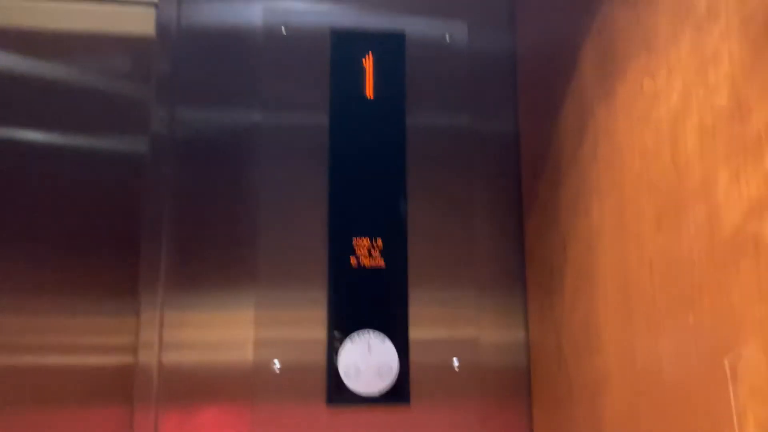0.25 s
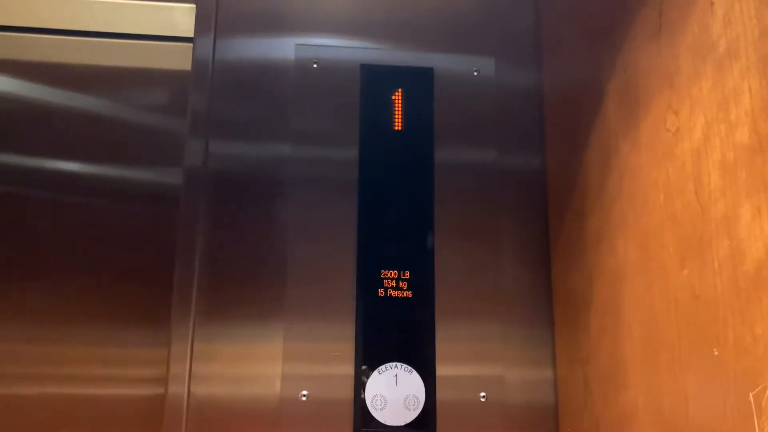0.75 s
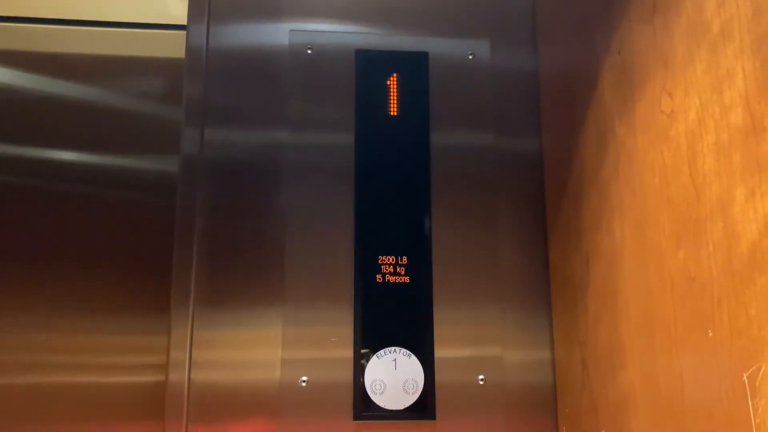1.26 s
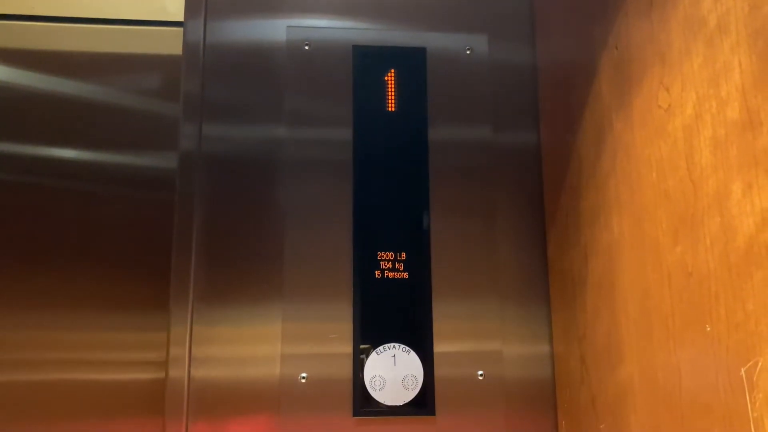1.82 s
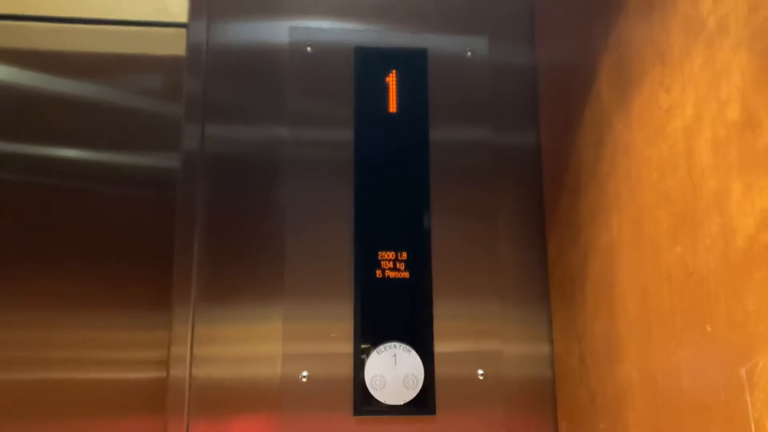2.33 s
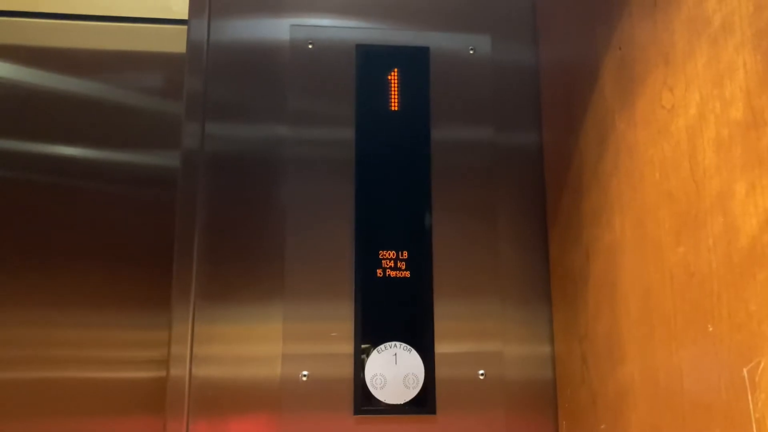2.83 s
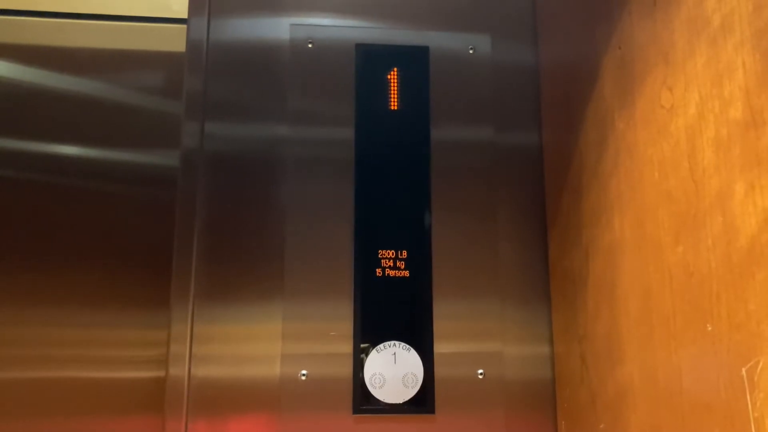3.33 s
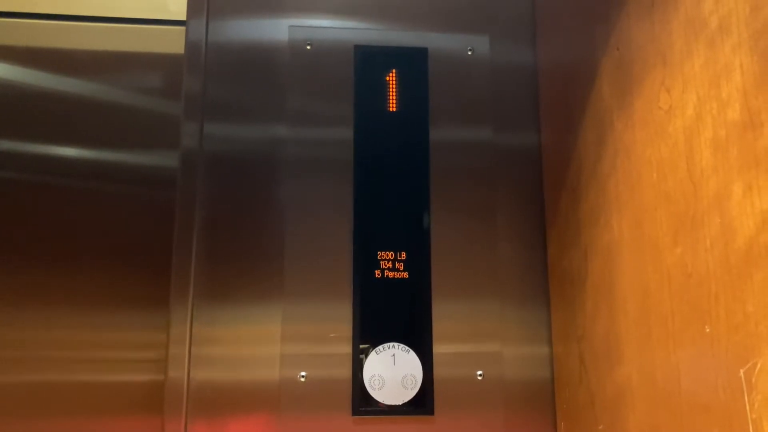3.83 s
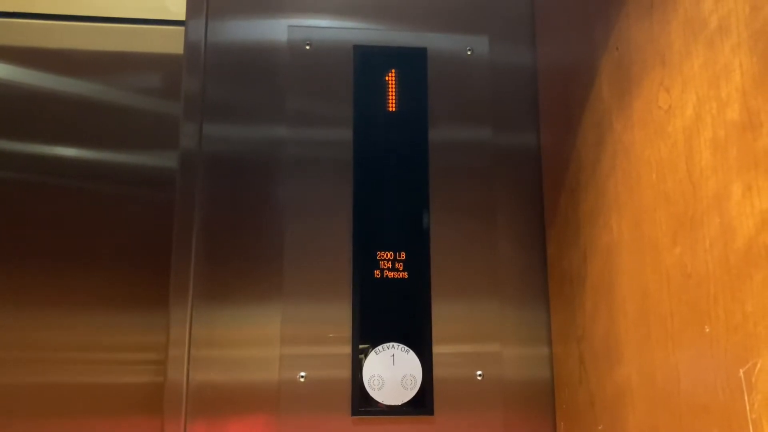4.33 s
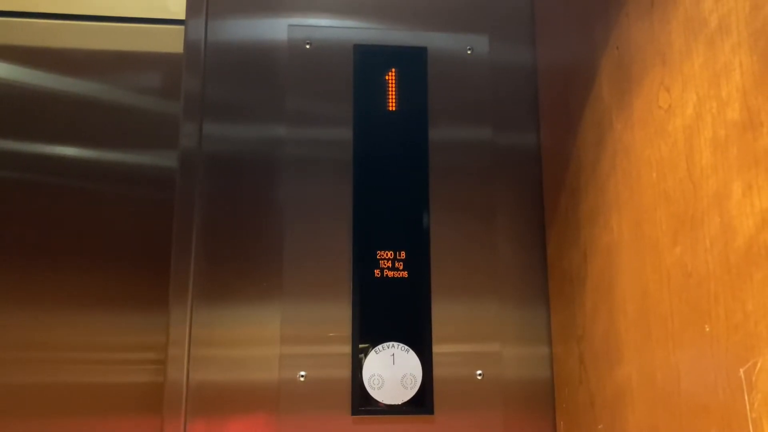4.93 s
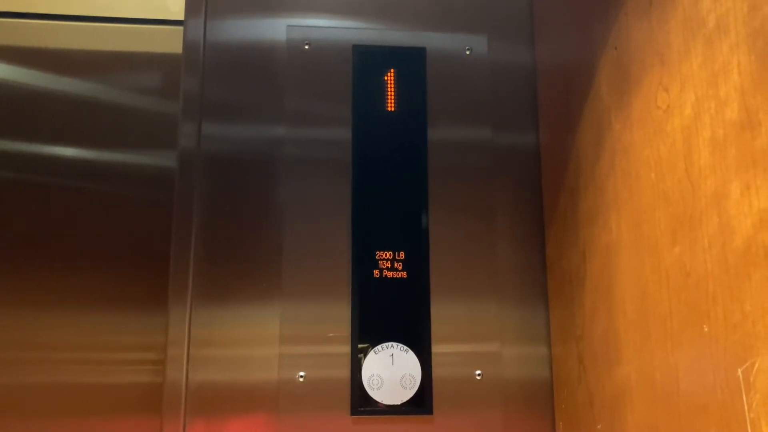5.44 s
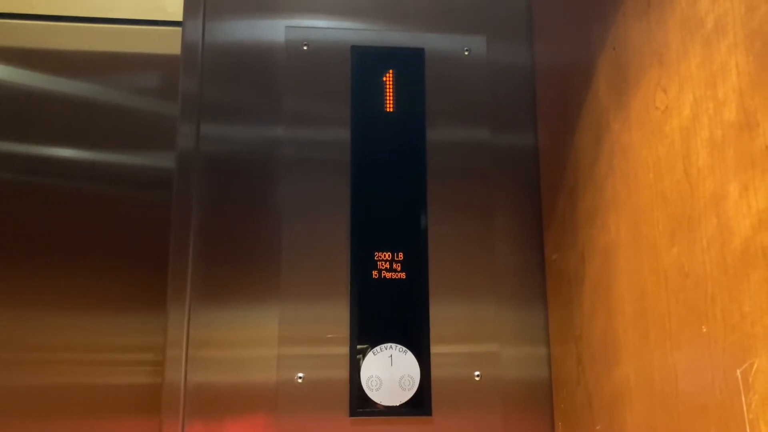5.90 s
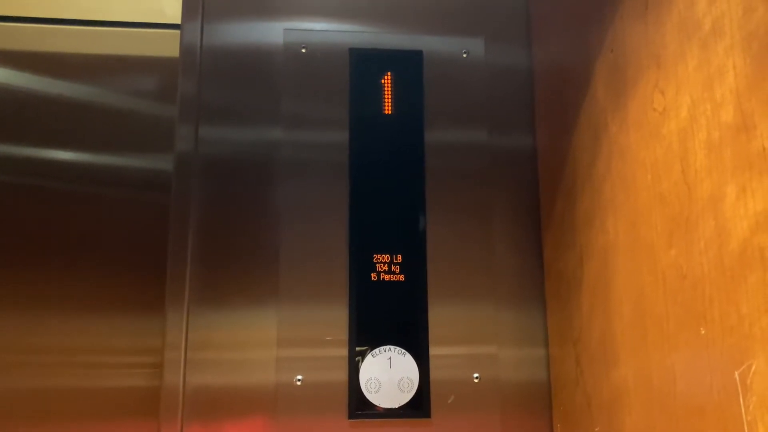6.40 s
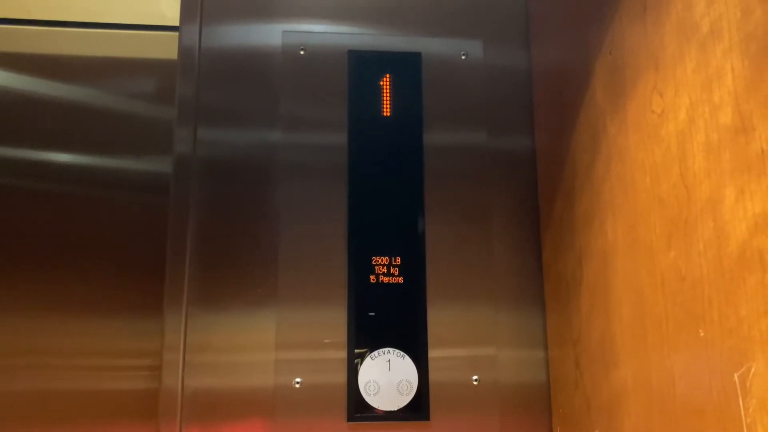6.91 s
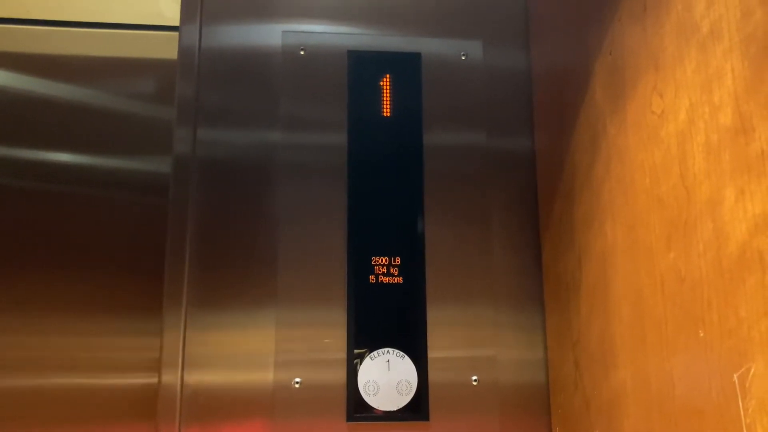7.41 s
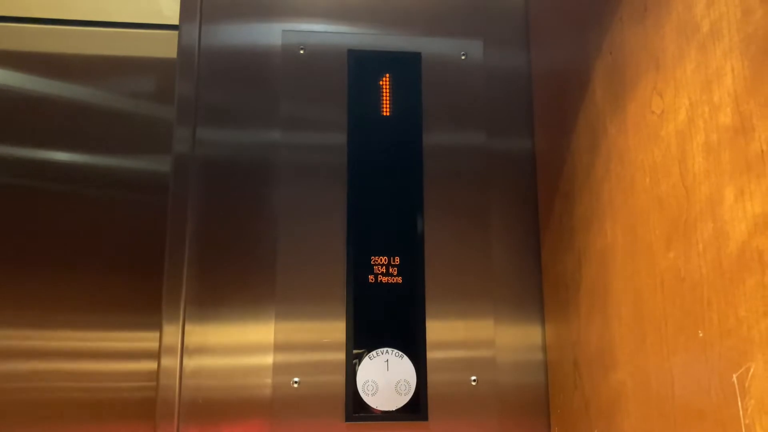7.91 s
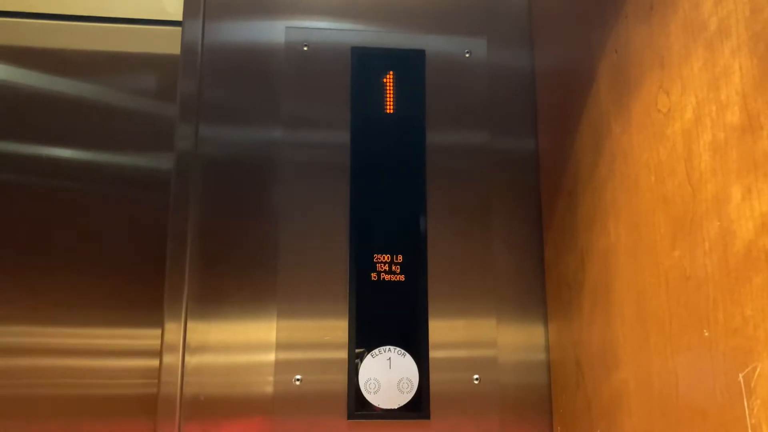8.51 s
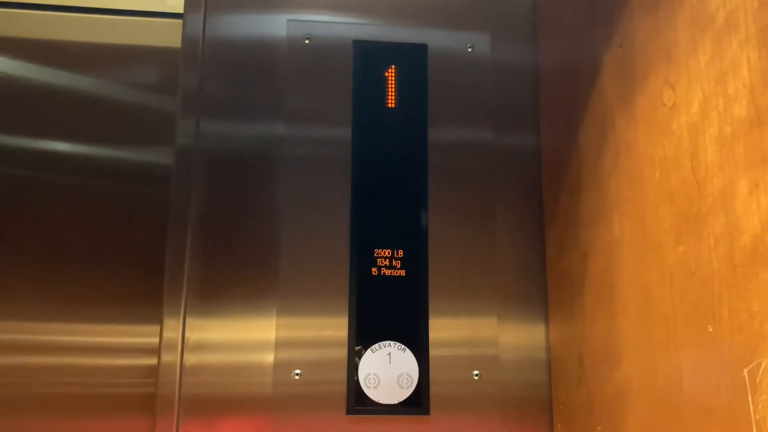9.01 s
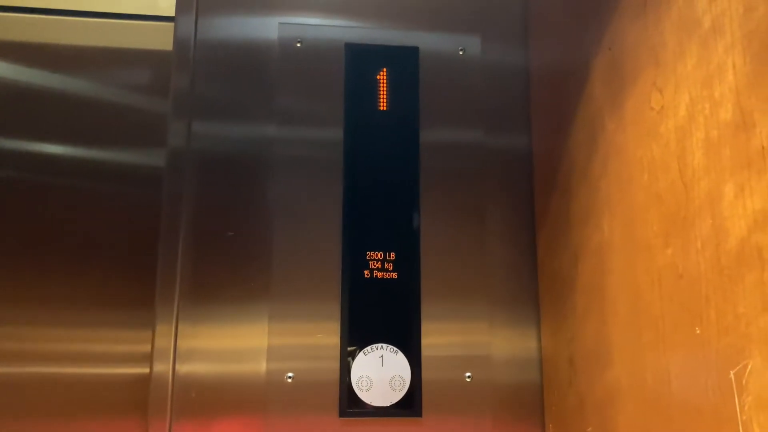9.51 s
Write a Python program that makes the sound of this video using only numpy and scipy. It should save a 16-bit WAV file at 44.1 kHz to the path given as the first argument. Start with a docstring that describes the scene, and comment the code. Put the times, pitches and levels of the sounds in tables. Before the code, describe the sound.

Heard from inside a small steel and wood elevator cab going down, with stereo microphones in the car. A continuous low rumble and dull air rush lie under a small fan motor's steady hum and thin, wavering whine. Its bearing hisses softly about three times a second, with occasional harder scrapes. The guide brushes briefly near the start; the deep boom swells near the end.

```python
"""Hydraulic elevator, descending, inside the cab

A stereo pair stands in the cab: steady air and the rumble of the ride lie behind, with passing low throbs.
A small induction motor, probably the cab fan, hums on its shaft orders and the mains and whines in
wavering strands; its bearing hisses in about three swells a second, with a few harder scrapes and ticks.
The car brushes its guide once and squeaks faintly once.
Tones are sums of sines; air, rumble, hiss and ringing are noise shaped by spectra and resonances.
"""
import sys
import numpy as np
from scipy import signal
from scipy.fft import rfft, irfft, next_fast_len
from scipy.io import wavfile
from scipy.ndimage import uniform_filter1d, map_coordinates

SR = 44100
rng = np.random.default_rng(int(sys.argv[2]) if len(sys.argv) > 2 else 0)


def transcribe(signal):
    """Save signal, clipped to [-1, 1], as a 16-bit WAV file at the path in sys.argv[1]."""
    frames = np.atleast_2d(signal).T
    limited = np.clip(frames, -1, 1)
    pcm = np.round(limited * 32767).astype(np.int16)
    wavfile.write(sys.argv[1], SR, pcm)


N = 429975  # length [samples]

# Rush of air, in phase at both microphones: (frequency [Hz], density before balance [dB per Hz])
AIR_IN_PHASE = [(10, -84.5), (25, -72), (45, -66), (200, -64.5), (245, -65), (350, -63.5), (470, -75.5),
                (640, -76), (800, -77.5), (1050, -84), (1200, -78.5), (1550, -84.5), (2000, -91.5),
                (2400, -89.5), (4100, -99), (6000, -112), (12000, -134)]
# Rush of air, in opposite phase: (frequency [Hz], density before balance [dB per Hz])
AIR_OPPOSED = [(20, -93), (55, -78), (115, -70.5), (170, -67.5), (300, -70), (470, -69), (700, -79),
               (1050, -85.5), (1200, -77.5), (1550, -83), (2500, -89.5), (4100, -99), (6000, -114),
               (12000, -130)]
# Low boom of the ride, before the frame's trim: (time [s], level [dB])
RIDE_LEVEL = [(0, -56), (1.5, -47), (2.3, -44.5), (3.2, -45), (5.6, -44), (6.2, -41), (7.5, -47),
              (8.3, -46.5), (9.2, -32), (9.75, -38.5)]
# Low air modes of the cab, before they follow the ride: (frequency [Hz], width [Hz], peak density [dB per Hz])
CAB_MODES = [(77, 11, -46.5), (92.3, 8.8, -44), (112.4, 6.3, -42), (125, 5.5, -43), (136, 7.6, -46),
             (151, 9, -44), (159.56, 6.6, -42), (177.2, 6.8, -51.5), (196.2, 9.2, -57), (214.7, 18, -61),
             (291.7, 9.2, -61.5), (406.3, 13, -61), (443.3, 12, -67.5), (476.5, 9, -65.5)]
# Sway of the car frame: (frequency [Hz], width [Hz], relative level [dB])
FRAME_MODES = [(54.6, 11, -2), (65, 4.2, 5), (84, 9, 5)]
# Throbs of the cab's low modes: (time [s], frequency [Hz], level [dB])
CAB_THROBS = [(.7, 115.3, -23), (1.38, 158.8, -32.5), (1.95, 160, -25.5), (2.2, 159.2, -25.5),
              (2.5, 157.7, -24), (2.849, 157, -26.5), (3.07, 116, -27), (4.0, 161.9, -26.5),
              (4.24, 119, -22.5), (4.55, 159.7, -27.5), (5.0, 125, -23), (5.12, 159, -35),
              (5.6, 124, -23.5), (5.72, 158.6, -25.5), (6.3, 160.5, -27.5), (6.78, 112, -23.5),
              (7.1, 161.2, -25), (7.18, 85.7, -25.5), (7.5, 159, -25.5), (8.55, 122, -26), (8.7, 161, -30),
              (8.86, 113, -25), (9.2, 124, -25), (9.55, 120.4, -26.5)]
# The guide brushing and squeaking: (time [s], length [s], frequency [Hz], width [Hz], level [dB])
GUIDE_SCUFFS = [(1.64, 0.085, 1640, 850, -48.5), (5.077, 0.034, 11900, 600, -73)]
# Slip of the fifth shaft order behind the mains: (time [s], count [beats])
SLIP_BEATS = [(0, -.05), (1.63, 5), (3.6, 11), (6.55, 20), (9.75, 29.45)]
# Swells of the bearing's rubbing, about one a beat: (time [s], length [s], height [dB])
RUB_SWELLS = [(-0.022, 0.18, 7), (0.26, 0.19, 5), (0.584, 0.13, 4), (0.873, 0.22, 6), (1.225, 0.17, 6),
              (1.534, 0.21, 5.5), (1.849, 0.21, 4.5), (2.2, 0.13, 7.5), (2.522, 0.2, 5), (2.836, 0.2, 4.5),
              (3.155, 0.2, 6), (3.538, 0.15, 8.5), (3.832, 0.19, 6.5), (4.183, 0.14, 7), (4.463, 0.21, 6.5),
              (4.832, 0.2, 6), (5.149, 0.16, 8), (5.443, 0.24, 4), (5.826, 0.16, 8.0), (6.118, 0.21, 6.5),
              (6.462, 0.17, 6.3), (6.782, 0.17, 8.5), (7.141, 0.18, 7), (7.47, 0.19, 6.5), (7.785, 0.23, 5),
              (8.145, 0.25, 5.5), (8.492, 0.11, 7.5), (8.838, 0.14, 6.5), (9.162, 0.2, 6.5),
              (9.502, 0.2, 7.5)]
# Hard scrapes of the bearing: (time [s], extra level [dB])
HARD_SCRAPES = [(.075, 5), (2.23, 3), (4.26, 4), (4.87, 3), (6.24, 5), (6.88, 3), (7.27, 1.5), (7.82, 1),
                (7.94, 4), (9.27, 6)]
# Dry ticks: (time [s], level [dB])
DRY_TICKS = [(3.538, -63), (4.185, -64), (4.53, -63)]
# Spectrum of the bearing hiss: (frequency [Hz], relative level [dB])
HISS_SPECTRUM = [(800, -2.5), (2200, 2), (3300, 5), (4000, 5.5), (5300, 5.5), (5650, -1), (6700, -2.5),
                 (7100, -6.5), (7650, -3), (7900, -5), (8700, -1.5), (9600, -5), (10700, -5), (12000, -14),
                 (14000, -23)]
# Ringing of the fan housing, before trim and swells:
# (frequency [Hz], width [Hz], peak density [dB per Hz], left-right [dB], left lead [rad])
HOUSING_MODES = [(537, 14, -66, 2, -1.5), (563, 10, -67, 2, -1.5), (637, 10, -72, -0.5, -2.5),
                 (660, 10, -72, 3, -1), (772, 12, -74.5, 0, -1), (805, 24, -77, 1, -1),
                 (895, 24, -78.5, 0, 1), (998, 14, -77, 1, 1), (1261, 12, -68, 2.5, 2.5),
                 (1305, 52, -69.5, 2.5, 0.5), (1349, 9.1, -64.5, 6.5, -1.33), (1364, 40, -72.5, 2.5, -1.14),
                 (1630, 30, -80.5, -0.5, 1.5), (1700, 20, -74.5, -2, 3), (1860, 47, -83, 1, 1.5),
                 (2130, 130, -81.7, -2.5, 0.6), (2455, 20, -83.5, 1.5, 0.5), (2658, 39, -84, -1.5, 1.5),
                 (3003, 26, -85, -1, 2.5), (3425, 60, -90, -1.5, 2), (4660, 24, -91.5, -4, 4),
                 (5390, 130, -98, -2.5, 1.5), (5945, 26, -100, 0, 2)]
# Slow rise and fall of the whine, used about its mean: (time [s], level [dB])
WHINE_LEVEL = [(0, 0.5), (1, .5), (1.6, 1.2), (2.3, 1), (2.6, -0.5), (3.25, -0.5), (3.45, -3), (3.7, 1),
               (4.2, 1.5), (4.45, -3), (4.75, 1), (6.6, -.8), (6.85, 1.5), (7.5, -2), (8, 2.5), (8.3, 1.5),
               (8.7, -1), (9.6, 0.5)]
# Lines of the shaft, before trim: (shaft order [1], level [dB], left-right [dB], left lead [rad])
SHAFT_ORDERS = [(2, -57, -1, 0), (3, -29.7, -1, .1), (4, -39.5, -1, .1), (5, -39.5, -1, .2),
                (6, -40, -1, .1), (9, -53, -4, .4), (11, -47.5, -1, .7), (12, -48.3, -1, 1),
                (13, -43.7, -1, .5), (15, -52, 3, -2), (18, -45.2, 1, .5), (20, -54, -2, .3),
                (21, -55.5, -2, -2.5), (23, -58, 7, 2.3), (25, -64, 8, .2), (27, -53, 2, -1.6),
                (28, -58.5, 5, -1.1), (30, -57.5, 3, .8), (44, -66, 3, 1.3), (54, -64, -5, -2.9),
                (57, -64, -4, 2.9), (59, -65, 7, 0), (89, -72.5, -2, .6), (144, -73.5, -5, 1.8),
                (147, -73.5, -1, 1.8)]
# Sum tones of shaft and mains, before trim: (shaft order [1], mains order [1], level [dB],
# left-right [dB], left lead [rad], lateness of the swell [beats])
SHAFT_MAINS_SUMS = [(0, 1, -31, -1, .2, .06), (3, 1, -53, -5, .6, 0), (6, 1, -47.8, -3, .7, .76),
                    (2, 2, -52.5, 0, .3, .52), (8, 1, -44.5, -1, .5, .11), (9, 1, -47, 2, .3, .13),
                    (4, 2, -50, 0, .3, .56), (20, 1, -60, 8, .2, .62), (21, 1, -59.5, 2, -2.4, .13),
                    (22, 1, -51.5, -6, -2.8, .2), (23, 1, -56.5, 1, -1.4, .13), (44, 2, -63, -1, -.2, .52),
                    (46, 2, -62, 2, .9, .52), (52, 1, -63, 2, -.8, .13), (47, 2, -55.2, 10, -1.4, .52),
                    (54, 1, -62, 6, .2, .13), (49, 2, -57, 5, .2, .52), (50, 2, -65, 3, .5, .52)]
# Stronger swells of the strand near 305 Hz: (time [s], extra level [dB])
STRAND_SURGES = [(2.7, 2.5), (3.01, 5), (3.63, 2), (4.95, 3), (6.55, 1.5), (9.63, 2)]
# Flutter of the hum's lines: (frequency [Hz], depth [dB])
LINE_FLUTTER = [(70, .6), (120, 1), (260, 2.3), (420, 1.8), (640, 2.5), (1350, 1.4), (3400, 3)]

MAINS_HZ = 120  # the magnetic pull, first mains order
BEAT_ORDER = 5  # the shaft order that slips behind it
WHINE_TURN_DB = 1.3  # scale of the whine's pulse in each turn
TOUCH_TURNS = 0.77  # place in each turn where the bearing presses hardest


def amp(db):
    """Decibels to gain."""
    return 10 ** (np.asarray(db) / 20)


def unit(x):
    """Scale to rms 1."""
    return x / np.sqrt(np.mean(x ** 2) + 1e-20)


def along(points, hz):
    """Read (Hz, value) points on a log frequency axis."""
    f, v = np.transpose(points)
    return np.interp(np.log(hz + 1), np.log(f + 1), v)


def curve(rows):
    """Turn (s, value) rows into one value per sample."""
    return np.interp(np.arange(N) / SR, *np.transpose(rows))


def bump(s, length):
    """A smooth rise and fall around time s, down to 1/e at length seconds either side."""
    return np.exp(-np.minimum(((np.arange(N) / SR - s) / length) ** 2, 50))


def wobble(rate):
    """A smooth random curve, rate knots a second."""
    knots = rng.standard_normal(400)
    coarse = np.linspace(0, N, 2000)
    smooth = map_coordinates(knots, [coarse * rate / SR], mode='mirror')
    return np.interp(np.arange(N), coarse, smooth)


def noise(response):
    """Noise whose density per root Hz is response(Hz)."""
    m = next_fast_len(N)
    spectrum = rfft(rng.standard_normal(m)) * response(np.fft.rfftfreq(m, 1 / SR))
    return irfft(spectrum, m)[..., :N] * np.sqrt(SR / 2)


def bell(hz, centre, width):
    """Gain of a resonance with steep skirts."""
    return 1 / (1 + ((hz - centre) * np.sqrt(2) / width) ** 2)


def mic_pair(pan_db, lead):
    """Complex gains at the left and right microphone of a standing wave in the cab."""
    half = np.array([[.5], [-.5]])
    return amp(half * pan_db) * np.exp(1j * half * lead)


def patchy(x, depth_db, across_hz=600, lasting_s=.035):
    """Brief random surges and dips, each in its own band, alike on both channels; rms set to 1."""
    hz, t, z = signal.stft(x, SR, nperseg=512)
    field = rng.standard_normal((200, 1500))
    place = np.meshgrid(hz / across_hz, t / lasting_s, indexing='ij')
    gain_db = map_coordinates(field, place, mode='mirror')
    return unit(signal.istft(z * amp(depth_db * gain_db), SR, nperseg=512)[1][:, :N])


def steel_walls(x, t60, wet):
    """Close steel walls add a short dense ring above the bass, decaying 60 dB in t60 seconds."""
    t = np.arange(SR // 3) / SR
    tail = rng.standard_normal((2, len(t))) * amp(-60 * t / t60)
    tail = signal.sosfilt(signal.butter(2, 400, 'high', fs=SR, output='sos'), tail)
    tail /= np.linalg.norm(tail, axis=1, keepdims=True)
    ring = signal.fftconvolve(x, tail, axes=1)[:, :N]
    return (x + wet * ring) / np.hypot(1, wet)


def air(left_db=.5):
    """A steady, slightly patchy rush: shaped noise, common and opposed, ringing between the walls."""
    mid = noise(lambda hz: amp(along(AIR_IN_PHASE, hz)))
    side = noise(lambda hz: amp(along(AIR_OPPOSED, hz)))
    pair = np.array([mid + side, mid - side]) * amp([[left_db], [-left_db]])
    rush = steel_walls(pair, t60=0.17, wet=0.35)
    return rush.std() * patchy(rush, depth_db=1.7, across_hz=130, lasting_s=.08)


def shaken(modes):
    """Noise through a bank of resonances, their powers added."""
    def response(hz):
        power = sum((amp(db) * bell(hz, f, w)) ** 2 for f, w, db in modes)
        return np.sqrt(power) * mic_pair(pan_db=-1.0, lead=0.11)
    return noise(response)


def rumble(frame_db=3, follow=0.17):
    """The moving car shakes the cab's air modes; a deeper boom of the frame follows the ride fully."""
    ride_db = curve(RIDE_LEVEL)
    cab = amp(follow * (ride_db - ride_db.mean())) * shaken(CAB_MODES)
    frame = amp(frame_db + ride_db) * unit(shaken(FRAME_MODES))
    return cab + frame


def throbs(throb_s=0.082):
    """Now and then one low mode of the cab swells up and dies away: a sine under a smooth bump."""
    t = np.arange(N) / SR
    boom = np.zeros(N)
    for s, hz, db in CAB_THROBS:
        tone = np.sin(2 * np.pi * (hz * t + rng.random()))
        boom += amp(db) * bump(s, throb_s) * tone
    return np.sqrt(2) * boom * abs(mic_pair(pan_db=-0.2, lead=0))


def scuffs():
    """The guide's brush and squeak: brief soft noise in one band each, independent per channel."""
    out = np.zeros((2, N))
    for s, length, f, w, db in GUIDE_SCUFFS:
        band = np.array([noise(lambda hz: bell(hz, f, w)) for mic in range(2)])
        out += amp(db) * unit(band) * bump(s, length)
    return out


def motor():
    """Mains cycles and shaft turns: the fifth shaft order slips about three cycles a second behind."""
    mains = MAINS_HZ * np.arange(N) / SR
    return mains, (mains - curve(SLIP_BEATS)) / BEAT_ORDER


def touch(turns, sharp=.4):
    """The press of the bearing through one turn of the shaft: a short peak and a long lull."""
    angle = 2 * np.pi * (turns - TOUCH_TURNS)
    return np.cos(angle) + sharp * np.cos(2 * angle)


def rub(rest_db=-75.5, grab_s=0.024, release_s=0.031, uneven_db=1.0):
    """Level of the rubbing before trim, dB: about once a beat the bearing takes hold and lets go."""
    t = np.arange(0, N, 100) / SR
    swell_db = np.zeros(len(t))
    for s, length, db in RUB_SWELLS:
        hold = np.tanh((t - s) / grab_s)
        let_go = np.tanh((t - s - length) / release_s)
        swell_db += db * (hold - let_go) / 2
    return rest_db + curve(np.c_[t, swell_db]) + uneven_db * wobble(31)


def scrapes(scrape_s=.022):
    """Extra rubbing, dB, where the bearing catches harder for an instant."""
    return sum(db * bump(s, scrape_s) for s, db in HARD_SCRAPES)


def ticks(centre_hz=7000, width_hz=9000, length_s=.0012):
    """Tiny dry ticks of the bearing: very short bursts of broad noise."""
    band = np.array([noise(lambda hz: bell(hz, centre_hz, width_hz)) for mic in range(2)])
    return unit(band) * sum(amp(db) * bump(s, length_s) for s, db in DRY_TICKS)


def bearing(rub_db, turns, hiss_db=7.0, turn_db=1.0, grit_db=1.6, ring_hz=4085, ring_db=-1):
    """Dry rubbing: gritty, patchy hiss pulsing once a turn, first at the right mic, with one thin ring."""
    lag = 12 / SR  # delay of the left channel [s]
    grit = unit(uniform_filter1d(rng.standard_normal(N), size=40))
    source = noise(lambda hz: amp(along(HISS_SPECTRUM, hz)) * mic_pair(0, -2 * np.pi * hz * lag))
    hiss = patchy(source, depth_db=3.0)
    ring = unit(noise(lambda hz: bell(hz, ring_hz, 70) * mic_pair(0, 1.8)))
    contact = amp(rub_db + turn_db * touch(turns) + grit_db * grit)
    return contact * (amp(hiss_db) * hiss + amp(ring_db) * ring)


def whine_swing():
    """Slow rise and fall of the whine about its mean, dB."""
    db = curve(WHINE_LEVEL)
    return db - db.mean()


def whine(rub_db, turns, level_db=-1, follow=0.58, swing=0.57):
    """The bearing keeps the housing's resonances ringing, more in each swell and once a turn."""
    surge = amp(swing * whine_swing())
    ringing = np.zeros((2, N))
    for f, w, db, pan_db, lead in HOUSING_MODES:
        mode = noise(lambda hz: amp(db) * bell(hz, f, w) * mic_pair(pan_db, lead))
        in_whine = 1200 < f < 1450  # this group alone surges slowly
        ringing += mode * (surge if in_whine else 1)
    drive_db = follow * (rub_db - rub_db.mean()) + WHINE_TURN_DB * touch(turns)
    return ringing * amp(level_db + drive_db)


def hum(mains, turns, shake_turns=0.0033, surge_s=0.08, flutter_rate=9, level_db=-0.6):
    """Three blades and the magnetic pull give lines and sum tones; close neighbours beat together.
    The shaft runs a little unevenly, so the high strands waver most."""
    start = rng.random(size=160)  # shared by close neighbours [cycles]
    whine_db = whine_swing() + WHINE_TURN_DB * touch(turns)
    surge_db = sum(db * bump(s, surge_s) for s, db in STRAND_SURGES)
    turns = turns + shake_turns * wobble(7)
    shaft_lines = [(k, 0, db, pan_db, lead, 0) for k, db, pan_db, lead in SHAFT_ORDERS]
    out = np.zeros((2, N))
    for k, m, db, pan_db, lead, late in shaft_lines + SHAFT_MAINS_SUMS:
        place = k + BEAT_ORDER * m  # close neighbours share a place
        swing_db = 0
        if 50 < place < 62:  # the whine's strands
            swing_db = whine_db
        elif place == 13:  # the strand near 305 Hz
            swing_db = surge_db
        flutter_db = along(LINE_FLUTTER, place * MAINS_HZ / BEAT_ORDER) * wobble(flutter_rate)
        phase = 2 * np.pi * (k * turns + m * mains - late + start[place])
        gains = mic_pair(pan_db, lead)
        level = amp(level_db + db + swing_db + flutter_db)
        out += np.sqrt(2) * level * abs(gains) * np.cos(phase + np.angle(gains))
    return out


def scene():
    """Everything heard in the cab, from the background to the motor."""
    mains, turns = motor()
    rub_db = rub()
    background = air() + rumble() + throbs() + scuffs()
    rubbing = ticks() + bearing(rub_db + scrapes(), turns)
    return background + rubbing + whine(rub_db, turns) + hum(mains, turns)


def record(dry, top_hz=14300):
    """The recorder cuts steeply above its band limit and opens and closes softly."""
    m = next_fast_len(N + SR // 2)
    faded = dry * signal.windows.tukey(N, .0006)  # about 3 ms at each end
    band_limit = 1 + (np.fft.rfftfreq(m, 1 / SR) / top_hz) ** 60
    return irfft(rfft(faded, m) / band_limit, m)[:, :N]


dry = scene()
out = record(dry)
transcribe(out)
```